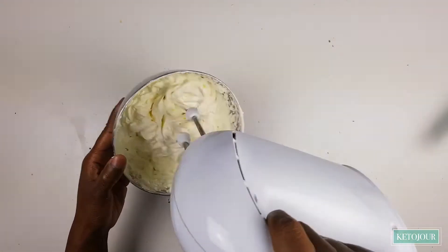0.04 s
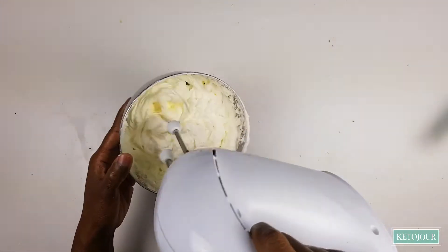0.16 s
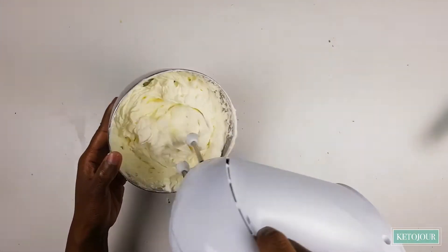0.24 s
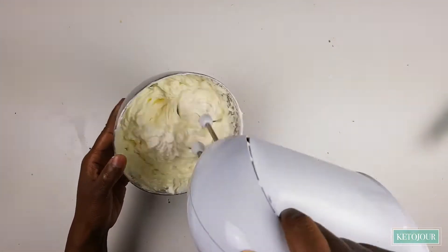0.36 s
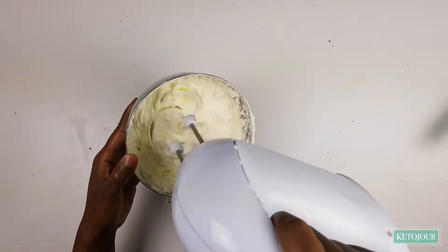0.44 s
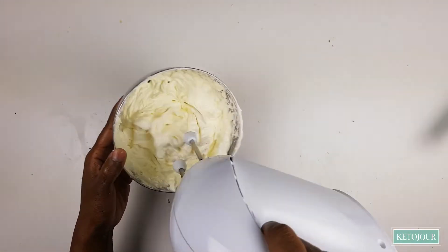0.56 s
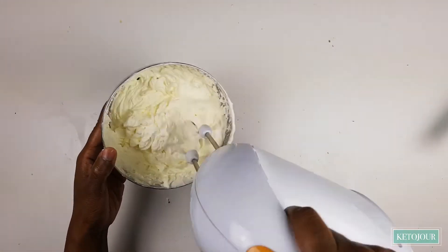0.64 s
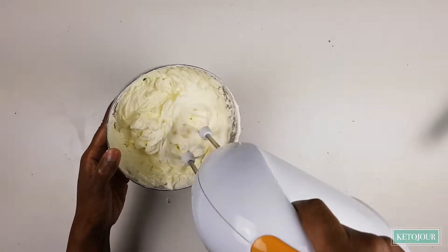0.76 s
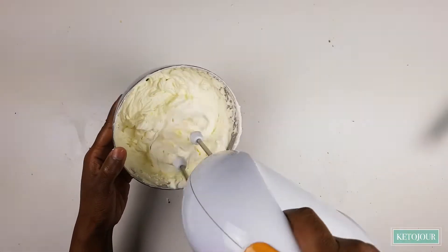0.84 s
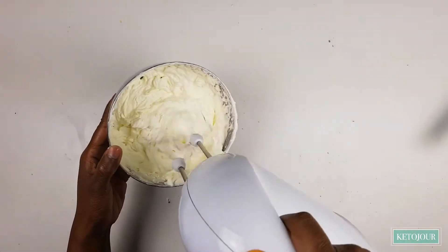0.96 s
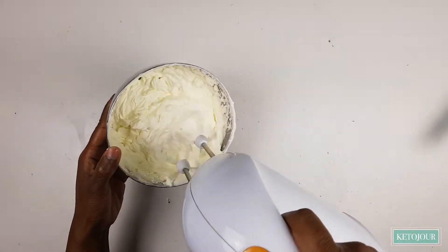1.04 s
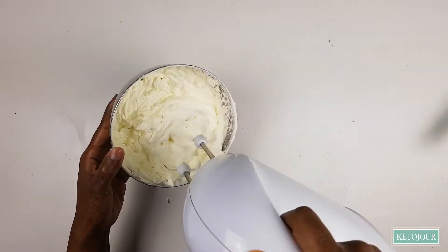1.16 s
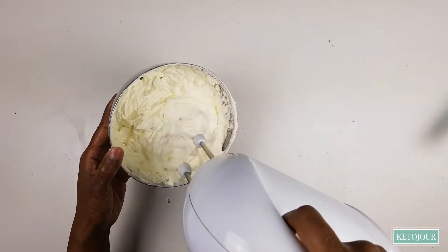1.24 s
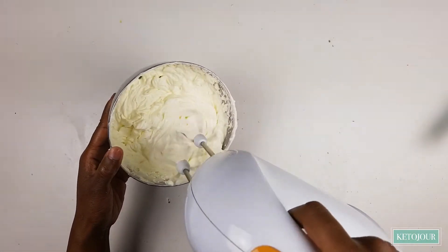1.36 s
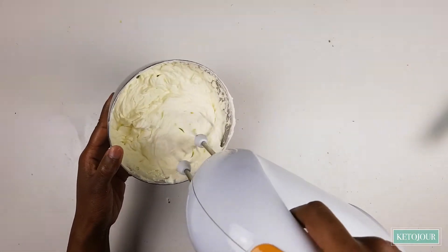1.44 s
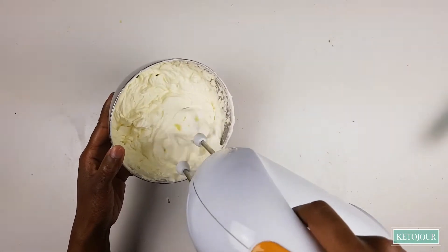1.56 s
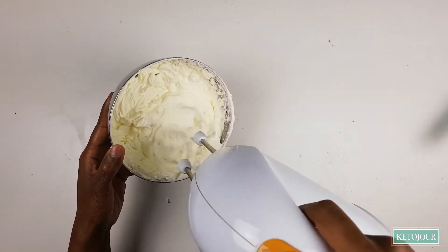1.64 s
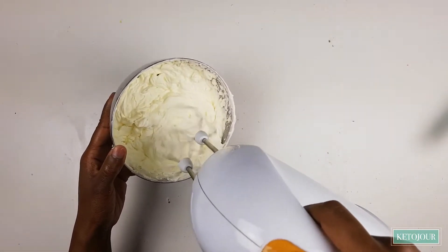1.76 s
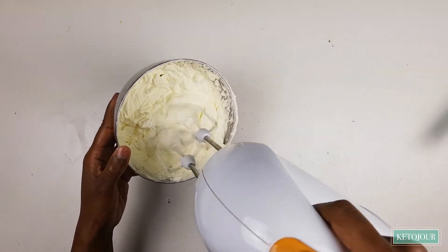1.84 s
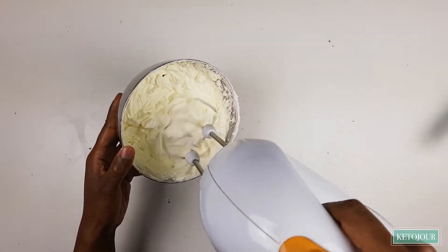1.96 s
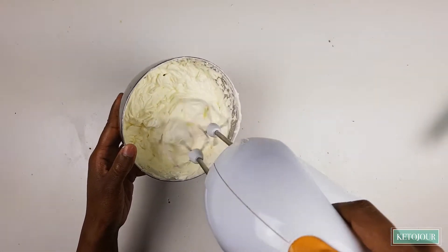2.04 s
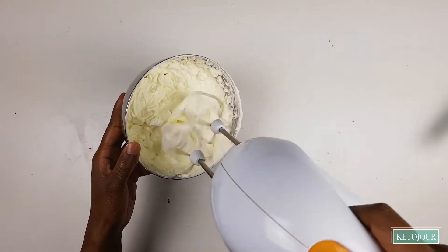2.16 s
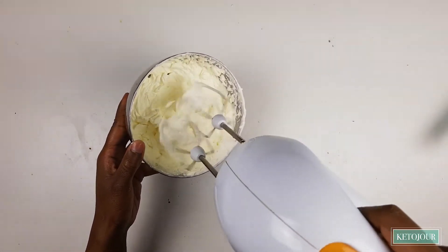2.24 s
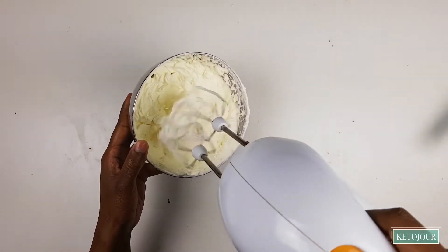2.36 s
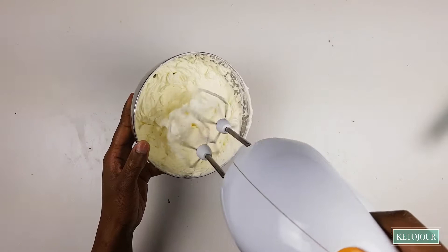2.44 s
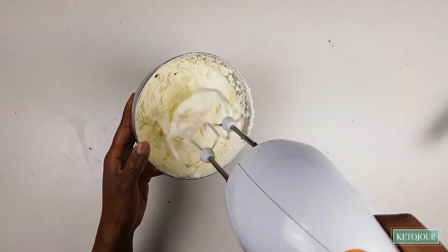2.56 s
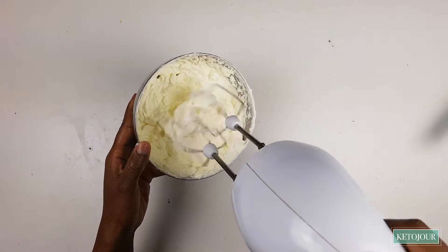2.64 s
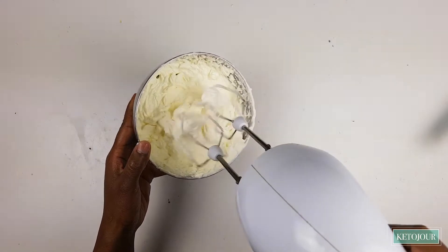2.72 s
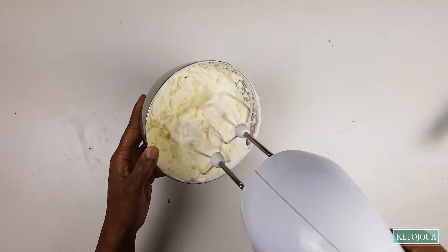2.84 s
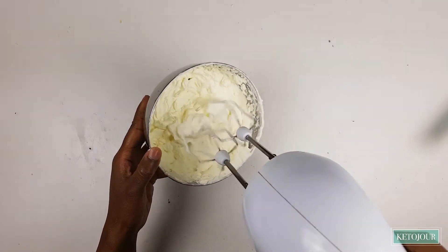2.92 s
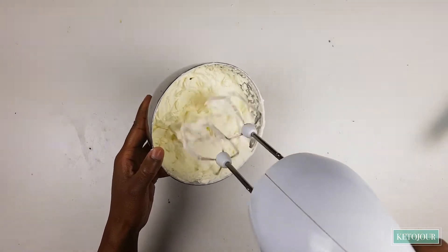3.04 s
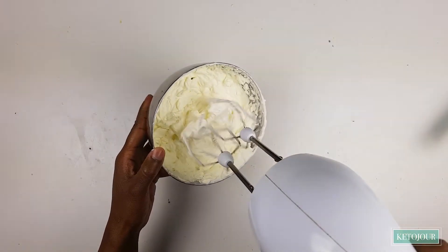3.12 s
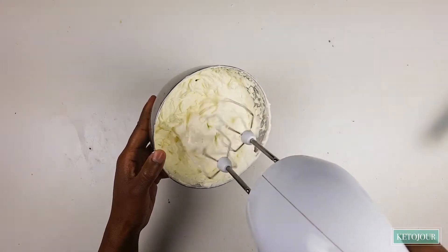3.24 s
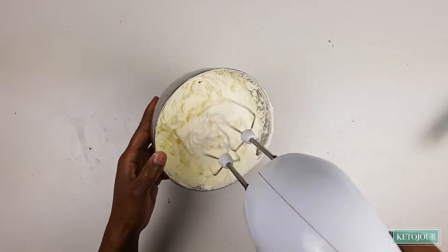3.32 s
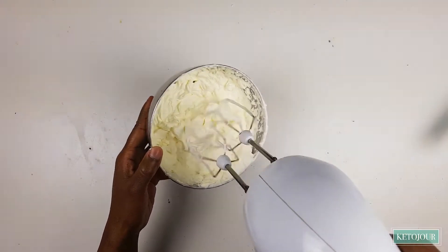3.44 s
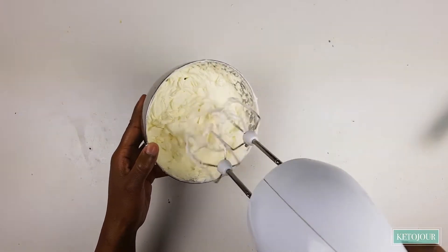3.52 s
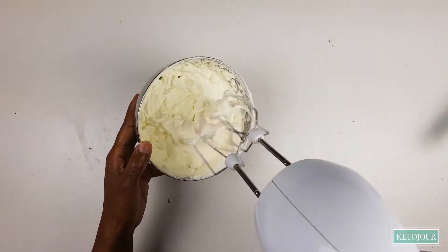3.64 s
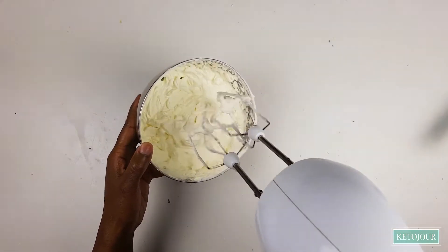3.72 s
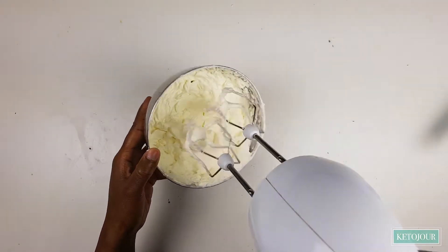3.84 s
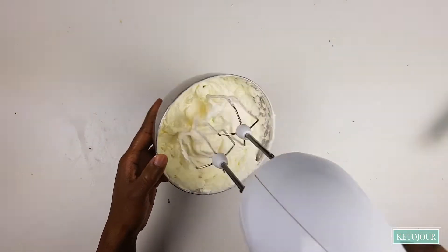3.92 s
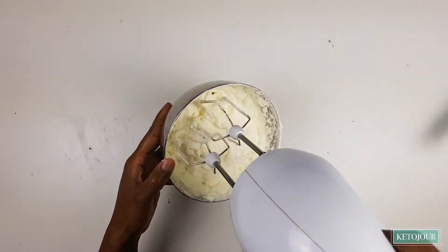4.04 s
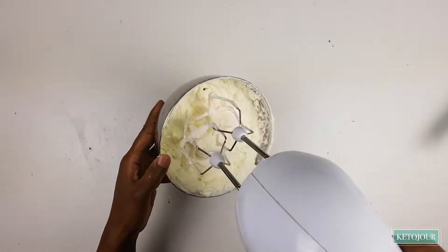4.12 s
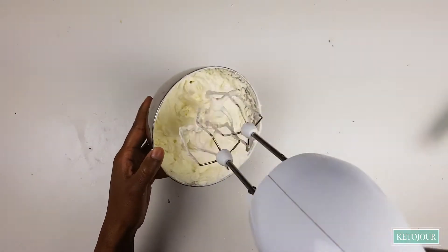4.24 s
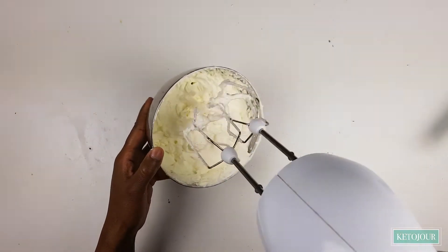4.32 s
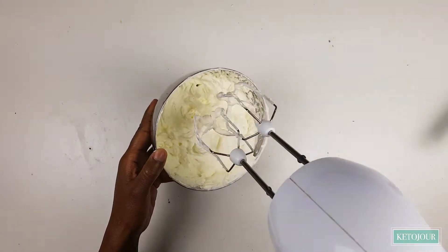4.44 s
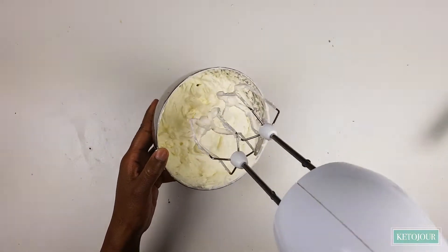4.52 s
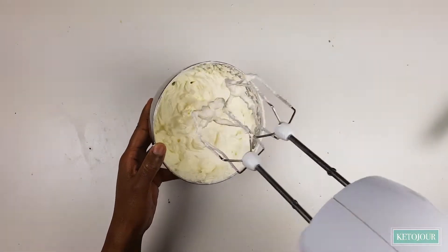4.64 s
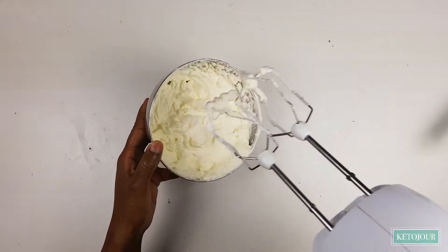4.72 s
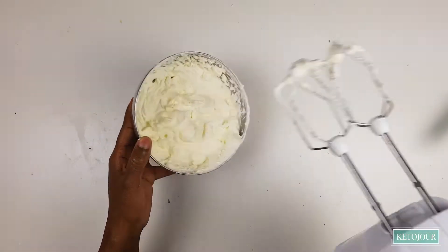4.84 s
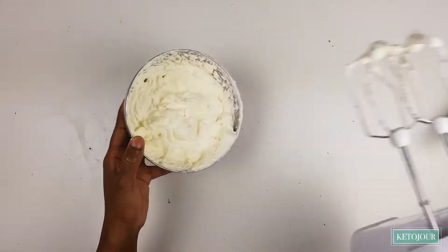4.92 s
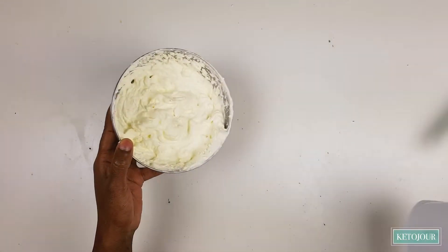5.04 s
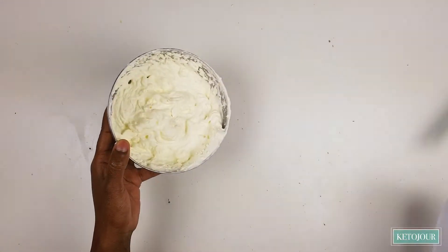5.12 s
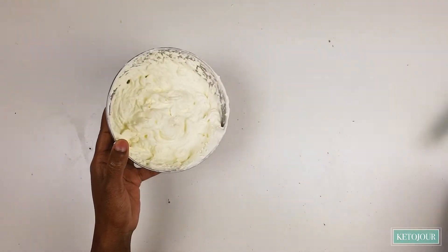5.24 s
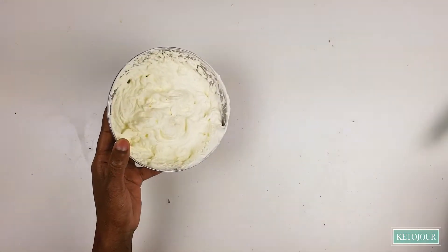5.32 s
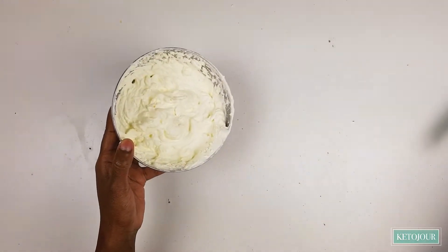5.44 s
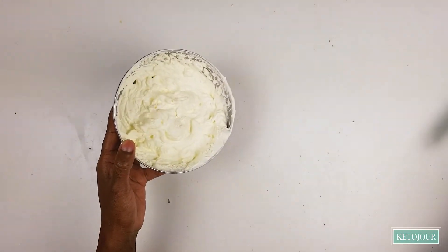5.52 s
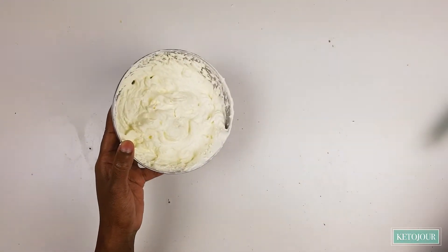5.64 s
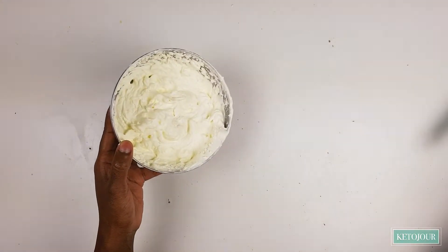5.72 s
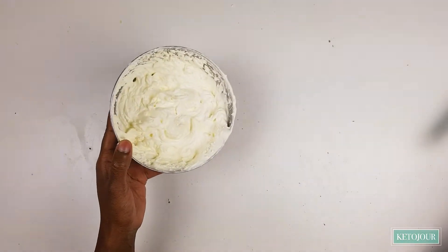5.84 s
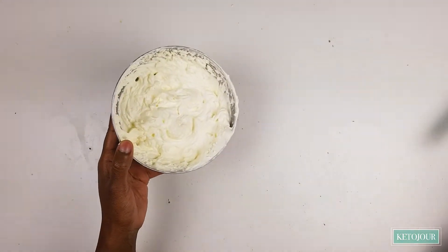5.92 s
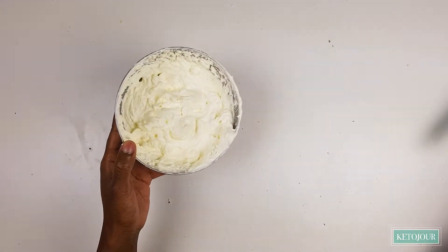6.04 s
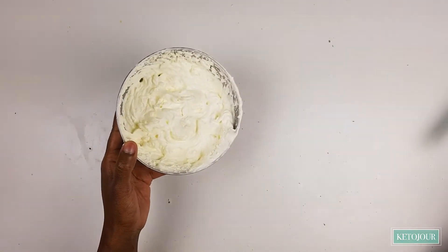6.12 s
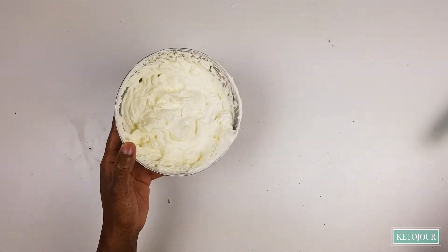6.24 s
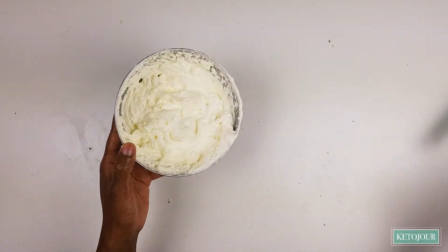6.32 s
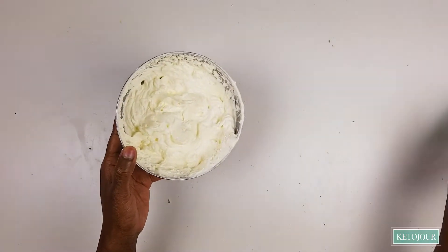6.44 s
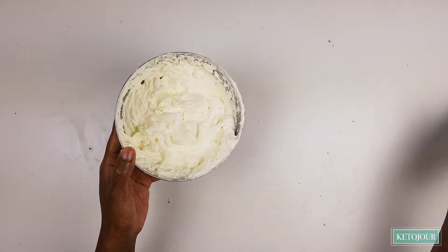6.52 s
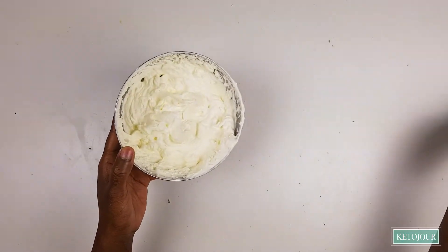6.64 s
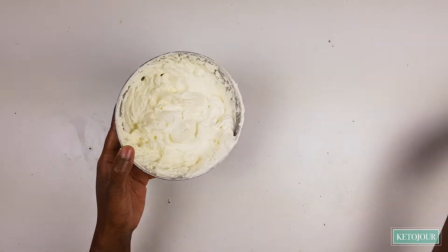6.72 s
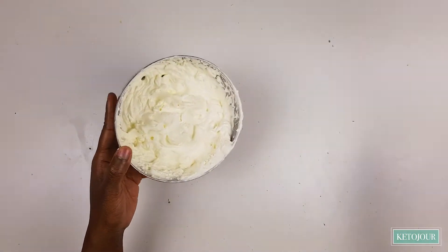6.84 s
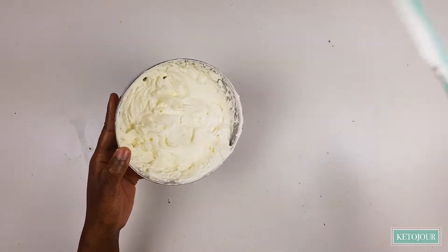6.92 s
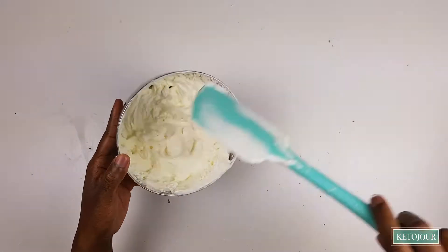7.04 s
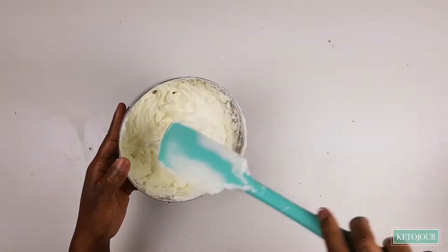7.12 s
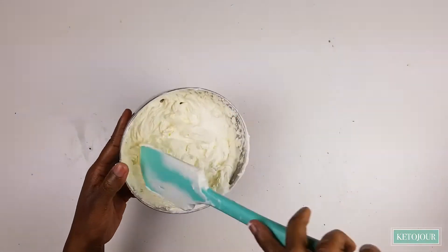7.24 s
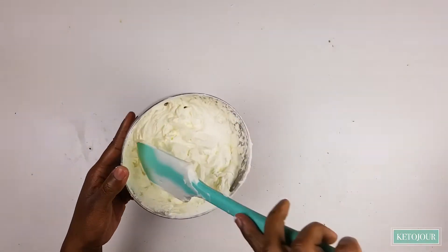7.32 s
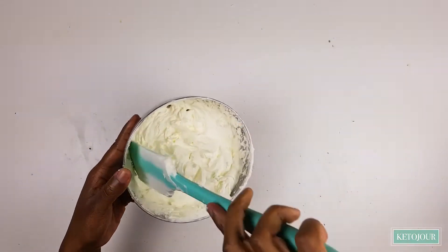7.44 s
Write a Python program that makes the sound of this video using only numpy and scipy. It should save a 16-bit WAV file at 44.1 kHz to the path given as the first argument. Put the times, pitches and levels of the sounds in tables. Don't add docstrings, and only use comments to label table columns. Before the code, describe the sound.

Very close, an electric hand mixer whips thick cream: harsh gear rattle, airy hiss and rapid uneven beater knocks against a small bowl. After about a second and a half the knocking stops and the motor coasts down, its whine sinking into silence. Faint bumps and a cloth rustle follow, then the mixer lands with a hard clunk on the counter and rocks once. Quiet kitchen air remains.

```python
import sys
import numpy as np
from scipy import signal
from scipy.fft import rfft, irfft, next_fast_len
from scipy.io import wavfile

SR = 44100
rng = np.random.default_rng(int(sys.argv[2]) if len(sys.argv) > 2 else 0)


def gain_from_db(level_db):
    decades = np.asarray(level_db, float) / 20
    return 10 ** decades


def pcm_store(signal):
    levels = np.round(np.clip(np.atleast_2d(signal), -1, 1) * 32767)
    wavfile.write(sys.argv[1], SR, levels.astype(np.int16).T)


N = 329868
SIZE = next_fast_len(N + SR)
HZ = np.maximum(np.arange(SIZE // 2 + 1) * SR / SIZE, 1)

# start_s, gear_rattle_db, cream_load (1 in the cream, 0 free
DRIVE_TRAIN = [(0.0, -25.5, 1), (0.3, -26.5, 1.1), (0.64, -26.5, .85), (1.08, -26, 1.1), (1.38, -27.5, .55),
               (1.6, -31.5, .05), (2.08, -34.5, .1), (2.68, -41, 0), (2.99, -44.5, .05), (3.38, -49.5, -.2),
               (3.56, -55, 0), (3.99, -66, .1), (4.34, -81, .1), (4.6, -110, 0)]
# start_s, thump_db, tick_db
BEATER_TURNS = [(0.0, -21.5, -20), (.071, -22, -18.5), (.157, -14, -19), (.249, -16, -16),
                (.342, -19.5, -20), (.414, -22, -26.5), (.503, -12.5, -19.5), (.587, -15.5, -16),
                (.667, -16, -19.5), (.739, -11, -19), (.811, -9, -19), (0.887, -17, -17.5),
                (.965, -12.5, -17.5), (1.042, -14, -17.5), (1.116, -18, -13), (1.193, -18, -19),
                (1.277, -18.5, -18.5), (1.366, -21, -24.5), (1.453, -25.5, -25), (1.551, -26.5, -30),
                (1.65, -61, -53)]


def motor():
    # start_s, rotor_hz
    rotor = [(1.1, 290), (1.3, 239), (1.452, 229), (1.691, 208), (2.001, 177.6), (2.4, 150), (2.87, 117.5),
             (3.3, 89.4), (3.952, 38.6), (4.4, 11.3)]
    # pitch_hz, width_hz, level_db
    housing = [(528, 11, 0), (590, 35, -5), (850, 70, 1.5), (1083, 51, 5), (1103, 53, -7), (1218, 41, -1.5)]
    # pitch_hz, width_hz, level_db
    shell = [(1534, 80, -2.5), (1893, 270, -2), (2140, 120, 1.5), (2600, 150, 1), (3302, 200, -6.5)]
    # pitch_hz, level_db (per Hz)
    gear_wash = [(71, -44.5), (120, -21), (429, -13.5), (515, -6), (944, -8), (1080, -3.5), (1760, -13),
                 (2530, -17), (4500, -24.5), (5850, -48.5), (9900, -120)]
    # pitch_hz, level_db (per Hz)
    fan_hiss = [(1760, -33.5), (3000, -14.5), (3380, -11), (4110, -6.5), (5520, -8.5), (8000, -5.5),
                (9530, -17), (11000, -10.5), (14000, -7), (15400, -13.5), (16000, -39)]
    # order (multiple of rotor_hz), level_db (under the gear rattle)
    weak_orders = [(6, -19), (8, -21), (20, -16), (24, -14), (36, -19), (12, -21), (16, -21), (30, -19),
                   (15, -22)]
    # pitch_hz, likeness (0 to 1, anything below 0 counts as 0)
    likeness = [(60, 0.57), (180, 1), (550, 1), (1650, 1), (4970, -0.15), (15000, -0.34)]

    rotor_hz = in_time(rotor)[0]
    gear_db, load = in_time(DRIVE_TRAIN)
    gear = gain_from_db(gear_db)
    upper = gain_from_db(gear_db - 13 + 7.5 * load)
    hiss = gain_from_db(-33 + 0.6 * gear_db + 7.5 * load)
    shake = gain_from_db(0.93 * drift(48))

    body = gear * shake * gain_from_db(-6) * rattle(housing, 4.5 * rotor_hz + 300, 5.2)
    body += upper * shake * rattle(shell, 4.3 * rotor_hz + 400, 4.5)
    turns = 2 * np.pi * np.cumsum(rotor_hz) / SR
    body += rotor_whine(rotor_hz, turns, load)
    faint = sum(gain_from_db(db + 2.5 * drift(6)) * np.sin(order * turns) for order, db in weak_orders)
    body += gear * through(faint, [*housing, *shell], -16) * gain_from_db(-2.5)

    alike = at_hz(likeness)
    wash = gear * shake * gain_from_db(-8.5) * noise(gear_wash, alike)
    return body, wash + hiss * gain_from_db(0.8 * drift(40)) * noise(fan_hiss, alike)


def rotor_whine(rotor_hz, turns, load):
    # level_db (at 200 turns a second), slope_db (per octave of speed)
    orders = [(-32.5, 20.5), (-41, 7.5), (-45, 12)]
    # pitch_hz, level_db
    case = [(440, -22), (515, 0.5), (610, -4), (870, -0.5), (980, 0), (1070, 11), (1350, -9.5), (2150, -2)]
    case_hz, case_db = np.transpose(case)
    whine = np.zeros(N)
    for order, (level_db, slope_db) in zip((1, 4, 10), orders):
        db = level_db + slope_db * np.log2(rotor_hz / 200)
        db = db + np.interp(order * rotor_hz, case_hz, case_db)
        db = db - 7 * load + 1.1 * drift(20)
        whine += np.sqrt(2) * gain_from_db(db) * np.sin(order * turns)
    return whine


def beaters():
    # pitch_hz, level_db, t60_s
    bowl = [(150, -1, 0.037), (342.7, -11.5, 0.092), (417, 4, 0.038), (577, -5.5, .025),
            (722.2, -9.5, 0.14)]
    # pitch_hz, level_db, t60_s
    wires = [(1130, -10, .025), (1720, -8, .015), (2130, 0, .028), (2580, -5, .035), (2850, -4, .013),
             (3050, -2, .013), (3300, 1, .016), (3500, -4, .013), (3700, -6, .013), (5070, -13, .01),
             (5600, -14, .008), (8240, -16, .008)]
    s, thump_db, tick_db = wire_passes()
    s = s - 0.001
    soft = signal.butter(2, [230, 650], "band", fs=SR, output="sos")
    hits = signal.sosfilt(soft, strike(s, thump_db - 6.5, bowl, 0.52))
    hits += strike(s, tick_db - 9, wires, 3.0, smear_s=0.002)
    hits += crack(s, tick_db - 14, 0.02, 3500, 15000, rise_s=0.00075)

    churn_colour = [(40, -30), (90, -16), (150, 1.5), (350, 8), (600, -3.5), (1200, -43)]   # (Hz, dB)
    churn = noise(churn_colour, 0.93)[0]
    churn_db = -27.5 + 0.67 * (in_time(BEATER_TURNS)[0] + 16)
    churn_db = churn_db + 21.5 * (in_time(DRIVE_TRAIN)[1] - 1)
    return hits + gain_from_db(churn_db) * gain_from_db(-7 + 2.5 * drift(30)) * churn


def wire_passes():
    # start_s, thump_db, tick_db
    hard_knocks = [(0.0155, -20, -16.5), (0.1554, -12, -19), (0.1981, -13.5, -25), (0.2468, -14, -12),
                   (0.2934, -17.5, -14.5), (0.3944, -18.5, -14), (0.4624, -13, -27), (0.5234, -11.5, -19.5),
                   (0.6092, -20.5, -12.5), (0.6475, -10, -15.5), (0.7042, -11.5, -23), (0.7761, -9, -20),
                   (0.8502, -10.5, -19), (.8684, -9.5, -18.5), (.909, -11, -22.5), (0.9277, -10.5, -14),
                   (1.0064, -9, -15), (1.0223, -21.5, -15.5), (1.0643, -13.5, -12.5), (1.0868, -7, -15.5),
                   (1.1162, -18.5, -14.5), (1.137, -19.5, -15), (1.154, -12, -26.5), (1.194, -13, -14),
                   (1.2148, -21, -13), (1.2376, -13.5, -23), (1.391, -23.5, -20.5), (1.4536, -14, -13.5),
                   (1.5274, -21, -21), (1.551, -20.5, -16.5)]
    jitter_s, near_spread_db = 0.001, 1.8
    far_db, far_spread_db = -6, 3
    turn = np.arange(0, len(BEATER_TURNS) - 1, 1 / 8)
    whole_turns = np.arange(len(BEATER_TURNS))
    passes = np.array([np.interp(turn, whole_turns, column) for column in np.transpose(BEATER_TURNS)]).T
    luck = rng.standard_normal(passes.shape)
    passes[::2] += luck[::2] * [jitter_s, near_spread_db, near_spread_db]
    passes[1::2] += luck[1::2] * [jitter_s, far_spread_db, far_spread_db] + [0, far_db, far_db]
    for knock in hard_knocks:
        nearest = np.argmin(abs(passes[::2, 0] - knock[0]))
        passes[2 * nearest] = knock
    return passes.T


def set_down():
    # start_s, boom_db, clack_db, crack_db
    contacts = [
        (5.8552, -8, -18, -29),
        (5.866, -16, -24, -40),
        (5.882, -20, -26, -44),
        (5.929, -24, -24, -38),
        (6.0186, -40, -23, -36),
        (6.025, -42, -29, -40),
    ]
    # pitch_hz, level_db, t60_s
    counter = [(100, -3, .25), (151, -5, .2), (188, -4, .17), (250, -1, .15), (334, -1, .13),
               (430, -4, .13), (544, -4, .15)]
    # pitch_hz, level_db, t60_s
    plastic = [(642, -1, .05), (764, 1, .045), (880, -2, .045), (991, -4, .05), (1280, -3, .05),
               (1500, -6, .05), (1950, -9, .05)]
    s, boom_db, clack_db, crack_db = np.transpose(contacts)
    blunt = signal.butter(2, 1100, fs=SR, output="sos")
    boom = signal.sosfilt(blunt, -strike(s, boom_db - 12, counter, 1.5))
    boom += crack(s, boom_db - 10, 0.13, 54, 810)
    boom += crack(s, boom_db - 21, 0.36, 30, 260, rise_s=0.0021)
    clack = strike(s, clack_db - 10.5, plastic, 2.0, smear_s=0.002)
    clack += crack(s, clack_db - 11, 0.12, 410, 1610)
    clack += crack(s, clack_db - 21.5, 0.1, 1500, 3400)
    return boom + clack + crack(s, crack_db - 0.5, 0.024, 3500, 21000, rise_s=0.00039)


def handling():
    # start_s, thud_db, thud_hz, scuff_db, scuff_hz
    bumps = [(3.251, -38.5, 774, -68, 2000), (3.275, -64, 5370, -57.5, 4000),
             (3.347, -80, 900, -56.5, 4200), (4.607, -50.5, 512, -64, 912), (4.61, -62, 3320, -72, 2005),
             (4.821, -50, 833, -61.5, 2270), (4.822, -64, 3900, -81, 4000), (4.959, -44.5, 172.5, -54, 395),
             (4.959, -62.5, 1414, -64, 9000), (4.963, -70, 3320, -50, 2900), (4.985, -75, 3300, -58, 3000),
             (5.095, -48.5, 526, -56.5, 2000), (5.181, -47, 100, -54, 150), (5.205, -40.5, 179.2, -65, 300),
             (5.387, -47, 140.9, -50.5, 1500), (5.731, -36, 150, -46.5, 443),
             (5.731, -62.5, 694, -52.5, 1340), (5.808, -60, 161.3, -58, 300), (6.398, -72, 3570, -67, 4500),
             (6.594, -44.5, 142.2, -63, 300), (6.745, -59, 250, -74, 890), (7.099, -61, 250, -72, 915),
             (7.312, -69, 602, -70, 1500)]
    # start_s, level_db, pitch_hz, t60_s
    free_wires = [
        (5.733, -54, 3200, .1),
        (5.735, -62, 7500, .07),
        (6.03, -51, 1965, .36),
    ]
    # start_s, level_db
    rustle = [(5.1, -68), (5.208, -72.5), (5.322, -64.5), (5.478, -68.5), (5.65, -88)]
    out = np.zeros(N + SR)
    t = np.arange(SR // 4) / SR
    for s, thud_db, thud_hz, scuff_db, scuff_hz in bumps:
        thud_t60_s = 0.022 + 11 / thud_hz
        scuff_t60_s = 0.037 + 61 / scuff_hz
        thud = gain_from_db(thud_db - 60 * t / thud_t60_s) * np.sin(2 * np.pi * thud_hz * t)
        thud *= 1 - np.exp(-t / 0.0011)
        scuff = gain_from_db(scuff_db - 60 * t / scuff_t60_s) * band_noise(len(t), scuff_hz / 1.6, scuff_hz * 1.6)
        out[round(s * SR):][:len(t)] += thud + scuff
    rings = sum(ring(clicks([s], db), hz, t60) for s, db, hz, t60 in free_wires)
    cloth_colour = [(100, 1), (350, -1), (1000, -13), (3000, -13), (6000, -32.5), (12000, -42)]   # (Hz, dB)
    cloth = noise(cloth_colour, 1)[0]
    return out[:N] + rings + gains(rustle)[0] * gain_from_db(2.5 + 2.9 * drift(40)) * cloth


def kitchen(sources):
    # pitch_hz, t60_s
    room_decay = [(100, 0.4), (1000, 0.36), (10000, 0.073)]
    # pitch_hz, level_db
    room_share = [(100, -12), (400, -4), (1500, 0), (6000, 7.5)]
    # pitch_hz, level_db
    lean = [(60, -0.5), (130, -1), (290, -3), (640, -4), (1410, -6), (3100, -6.5), (6820, -15), (15000, 3)]
    wall_lags = rng.integers(600, 2300, 20)
    bounce_taps = rng.integers(30, 330, (6, 2, 1))
    w = 2 * np.pi * HZ / SR
    t60 = at_hz(room_decay)
    wet = np.zeros((2, len(HZ)), complex)
    for k, lag in enumerate(wall_lags):
        lap = gain_from_db(-60 * lag / SR / t60) * np.exp(-1j * w * lag)
        wet[k % 2] += (-1) ** (k // 2) * lap / (1 - lap)
    for lag in (53, 131, 227):
        delay = np.exp(-1j * w * lag)
        wet *= (delay - 0.6) / (1 - 0.6 * delay)
    share = gain_from_db(at_hz(room_share))
    bounces = sum((-1) ** k * np.exp(-1j * w * tap) for k, tap in enumerate(bounce_taps))
    near = 1 + gain_from_db(-16) * share * bounces
    out = 0
    for x, wet_db, lead in sources:
        arrival = np.array([[max(-lead, 0)], [max(lead, 0)]])
        direct = near * np.exp(-1j * w * arrival)
        out = out + rfft(x, SIZE) * (direct + gain_from_db(wet_db) * share * wet)
    sides = gain_from_db(at_hz(lean) / 2 * np.array([[1], [-1]]))
    return irfft(out * sides, SIZE)[:, :N]


def still_air():
    # pitch_hz, level_db
    air_colour = [(18, -37.5), (30, -8), (109, -5.5), (141, -3.5), (311, -12.5), (526, -14.5), (600, -17),
                  (702, -15), (937, -21), (1280, -17.5), (5900, -31), (10000, -34.5), (14800, -28.5),
                  (16000, -25.5)]
    return gain_from_db(-66.5) * noise(air_colour, at_hz([(60, 0.3), (400, 0.34), (3000, 0.072)]))


def rattle(modes, per_s, spread_db):
    contact = rng.random(N) < len(modes) * per_s / SR
    teeth = contact * rng.choice([-1, 1], N) / np.sqrt(per_s)
    teeth *= gain_from_db(spread_db * np.minimum(rng.exponential(1, N), 4))
    dealt = rng.integers(0, len(modes), N)
    out = np.zeros(N)
    for k, (hz, width_hz, db) in enumerate(modes):
        out += gain_from_db(db) * rms_one(ring(teeth * (dealt == k), hz, 1.4 / width_hz))
    return rms_one(out)


def through(x, modes, leak_db):
    out = gain_from_db(leak_db) * x
    for hz, width_hz, db in modes:
        out = out + gain_from_db(db) * 2 * np.pi * width_hz / SR * ring(x, hz, 2.2 / width_hz)
    return out


def strike(times, db, modes, spread_db, smear_s=0):
    luck = spread_db * rng.standard_normal((len(times), len(modes)))
    late = smear_s * rng.random((len(times), len(modes)))
    out = np.zeros(N)
    for k, (hz, mode_db, t60) in enumerate(modes):
        out += ring(clicks(times + late[:, k], db + mode_db + luck[:, k]), hz, t60)
    return out


def crack(times, db, t60, low_hz, high_hz, rise_s=0.00012):
    rise = np.exp(-1 / (rise_s * SR))
    fall = gain_from_db(-60 / (t60 * SR))
    puff = signal.lfilter([1 - rise], np.convolve([1, -rise], [1, -fall]), clicks(times, db) + 1e-18)
    return puff * band_noise(N, low_hz, high_hz)


def ring(x, hz, t60):
    r, w = gain_from_db(-60 / (t60 * SR)), 2 * np.pi * hz / SR
    return signal.lfilter([0, np.sin(w)], [1, -2 * r * np.cos(w), r * r], x + 1e-18)


def clicks(times, db):
    out = np.zeros(N)
    at = np.round(np.asarray(times) * SR).astype(int)
    np.add.at(out, np.maximum(at, 0), gain_from_db(db))
    return out


def noise(spectrum, alike):
    mid, side = rfft(rng.standard_normal((2, SIZE)))
    alike = np.clip(alike, 0, 1)
    pair = np.sqrt(1 + alike) * mid + np.sqrt(1 - alike) * side * [[1], [-1]]
    return rms_one(irfft(pair * gain_from_db(at_hz(spectrum)), SIZE)[:, :N])


def band_noise(size, low_hz, high_hz):
    band = signal.butter(2, [low_hz, min(high_hz, 0.45 * SR)], "band", fs=SR, output="sos")
    return rms_one(signal.sosfilt(band, rng.standard_normal(size)))


def drift(rate):
    r = np.exp(-80 * np.pi * rate / SR)
    slow = signal.lfilter([1], [1, -2 * r, r * r], rng.standard_normal(N // 40 + 2002))[2000:]
    return np.interp(np.arange(N) / 40, np.arange(len(slow)), rms_one(slow))


def in_time(rows):
    s, *columns = np.transpose(rows)
    return [np.interp(np.arange(N) / SR, s, c) for c in columns]


def gains(rows):
    silent = (-120,) * (len(rows[0]) - 1)
    before, after = (rows[0][0] - 0.02, *silent), (rows[-1][0] + 0.03, *silent)
    return gain_from_db(in_time([before, *rows, after]))


def at_hz(points):
    hz, values = np.transpose(points)
    return np.interp(np.log(HZ), np.log(hz), values)


def rms_one(x):
    return x / np.sqrt(np.mean(x ** 2) + 1e-20)


def scene():
    body, diffuse = motor()
    placed = kitchen([(body, -17, 8), (beaters(), -19, 0), (handling() + set_down(), -17, 9)])
    low_cut = signal.butter(3, 75, "high", fs=SR, output="sos")
    wide = diffuse * gain_from_db([[1.5], [-1.5]])
    return signal.sosfilt(low_cut, gain_from_db(0.5) * placed + wide) + still_air()


def low_pass(x):
    return signal.sosfilt(signal.butter(12, 16150, fs=SR, output="sos"), x)


def record(dry):
    top_cut = signal.cheby2(10, 50, 16250, fs=SR, output="sos")
    return low_pass(signal.sosfilt(top_cut, dry))


dry = scene()
out = record(dry)
pcm_store(out)
```